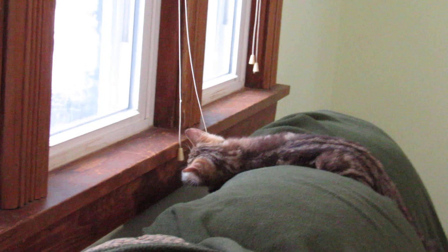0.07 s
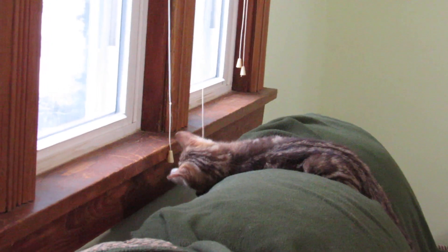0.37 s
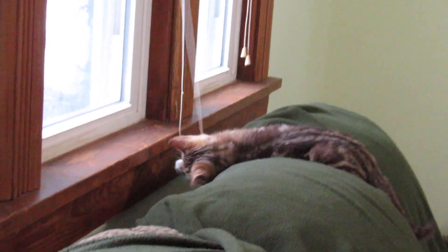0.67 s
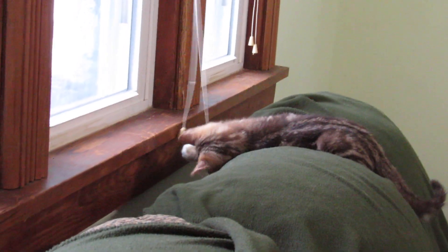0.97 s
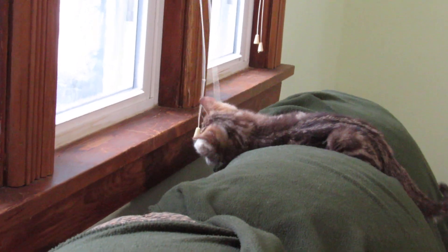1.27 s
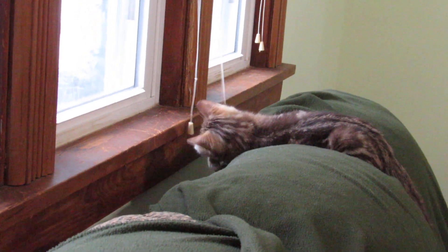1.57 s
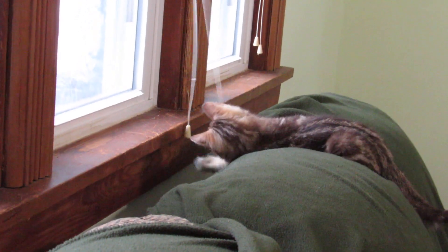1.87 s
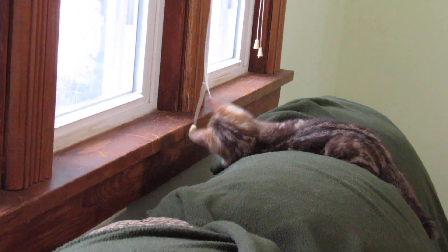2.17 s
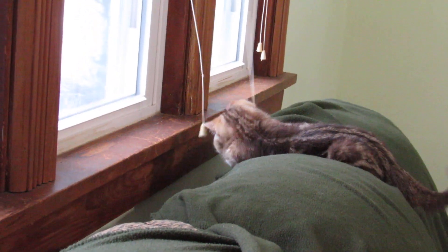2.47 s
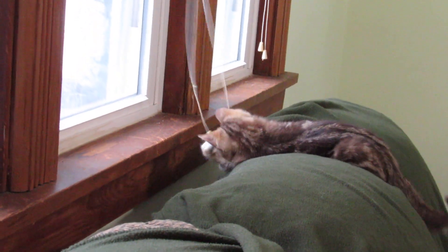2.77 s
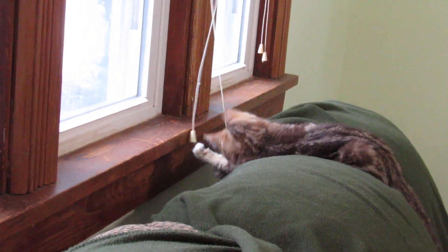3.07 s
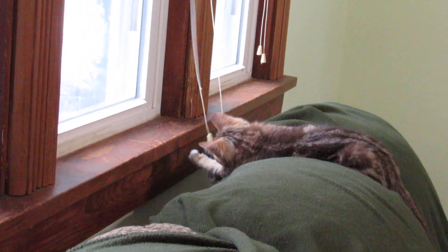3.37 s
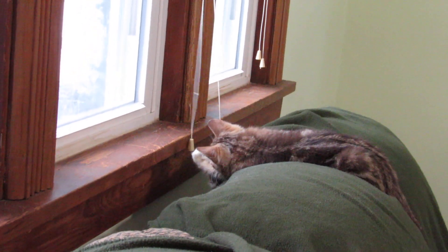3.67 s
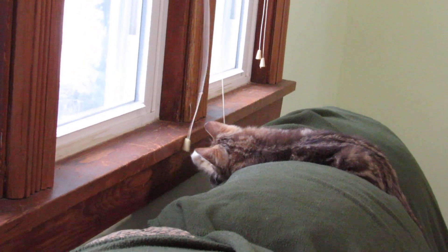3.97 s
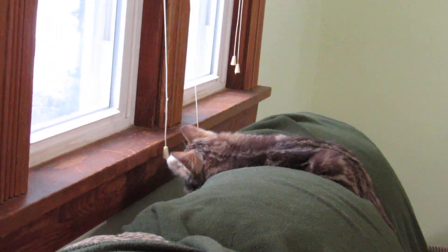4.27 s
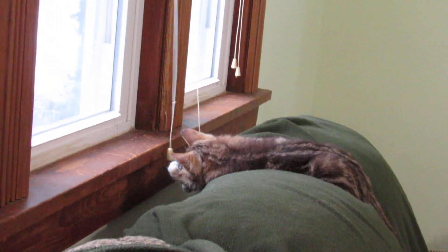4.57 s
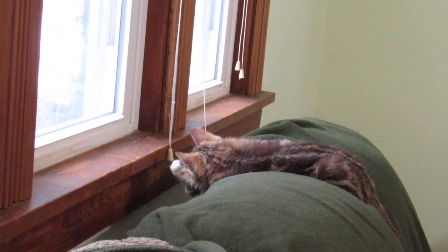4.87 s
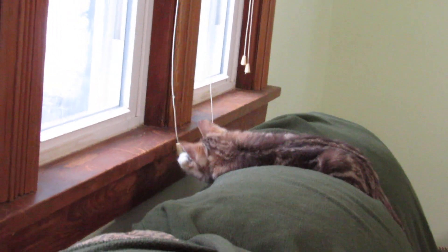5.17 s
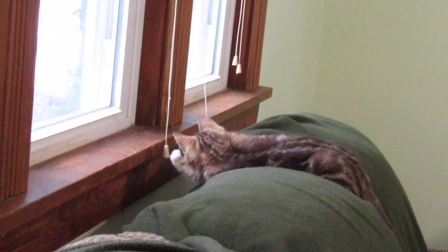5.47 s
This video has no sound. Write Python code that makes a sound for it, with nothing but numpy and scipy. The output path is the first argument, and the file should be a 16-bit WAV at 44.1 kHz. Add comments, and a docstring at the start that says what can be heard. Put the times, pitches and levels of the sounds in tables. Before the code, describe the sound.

Tiny, uneven ticks and brief scratchy rasps come from a kitten chewing and batting at blind cords, with a faint rustle of fur against a sofa. The light patter carries on the whole time, with the clearest click about halfway through. Everything is quiet, heard through a small microphone in a room with short reflections, over a steady low hum and soft airy noise.

```python
"""Mains hum and a soft rush of air fill a quiet room, picked up by a small camera's two microphone ports.
On a sofa by the window a kitten lies mouthing and pawing the blind cords. Its mouth and the cord make
tiny pitched clicks, part ring and part rub; fur, claws and cord scuff in short rasps, and its coat
rustles on the sofa cover. Window and wall return close echoes of the clicks and rasps."""
import sys
import numpy as np
from scipy import signal
from scipy.fft import rfft, irfft
from scipy.io import wavfile

SR = 44100
rng = np.random.default_rng(int(sys.argv[2]) if len(sys.argv) > 2 else 0)


def materialize(psi):
    """Save the field psi as 16-bit PCM at rate SR to the path in sys.argv[1].

    A 1-D psi becomes a single channel; in a 2-D psi each row is a channel.
    """
    bounded = np.clip(np.atleast_2d(psi).T, -1, 1)
    quanta = np.round(bounded * 32767).astype(np.int16)
    wavfile.write(sys.argv[1], SR, quanta)


N = 242991

# slow rise and fall of the treble, followed by fur, faint ticks and faint rasps: time_s, level_db
TREBLE_SWELL = [(0.27, -0.5), (0.35, -1.5), (0.79, -2.1), (0.99, 0), (1.35, -3.5), (1.71, 3), (1.79, 1),
                (2.09, 3), (2.57, -0.4), (2.77, -1), (2.91, 1.3), (3.77, 0.5), (4.01, 0.6), (4.09, -3),
                (4.23, 2), (4.73, -1.5), (4.97, 2.5), (5.49, 0.7)]


def amp(db):
    """Decibels to gain."""
    return 10 ** (np.asarray(db) / 20)


def unit(x):
    """Scales to rms 1."""
    return x / np.sqrt(np.mean(x ** 2) + 1e-20)


def read(points, hz):
    """Reads a table on a log-frequency axis."""
    f, value = np.transpose(points)
    return np.interp(np.log(hz + 1), np.log(f + 1), value)


def band(hz, centre_hz, spread):
    """A bell-shaped band; spread is in octaves."""
    return np.exp(-(np.log2((hz + 1) / centre_hz) / (2 * spread)) ** 2)


def add(mix, s, sound):
    """Adds a sound to the mix at time s."""
    part = mix[..., round(s * SR):][..., :sound.shape[-1]]
    part += sound[..., :part.shape[-1]]


def drift(rate_hz):
    """Slow random motion of rms 1."""
    hz = np.fft.rfftfreq(N, 1 / SR)
    return unit(irfft(rfft(rng.standard_normal(N)) * np.exp(-(hz / rate_hz) ** 2), N))


def treble_db(s):
    """The treble's rise or fall at time s."""
    return np.interp(s, *np.transpose(TREBLE_SWELL))


def ports(pair, colour):
    """Colours two unrelated signals and makes them as alike as the two microphone ports hear them."""
    # likeness of the two ports: frequency_hz, coherence (0-1)
    likeness = [(60, 0.36), (300, 0.37), (700, 0.75), (1400, 0.79), (3100, 0.96), (6800, 0.63), (11000, 0),
                (15000, 0)]
    size = pair.shape[1]
    hz = np.fft.rfftfreq(size, 1 / SR)
    mid, other = rfft(pair)
    coherence = np.clip(read(likeness, hz), 0, .98)
    side = other * np.sqrt((1 - coherence) / (1 + coherence))
    return irfft(np.array([mid + side, mid - side]) * colour(hz), size)


def air(notch_hz=680, notch_width_hz=520, low_cut_hz=41):
    """Steady room rush as the camera hears it, hollowed near 680 Hz by the camera's notch filter."""
    # underlying slope of the rush: frequency_hz, density_db
    slope = [(45, -63), (100, -68), (160, -72), (215, -78), (290, -69), (420, -71.5), (900, -75),
             (1600, -84), (2400, -92.5), (4500, -99.5), (9000, -101.5), (15000, -108)]
    # resonances that stand out of it: centre_hz, width_hz, height_db
    resonances = [(266, 11, 11), (493, 19, 12), (1105, 50, 6), (1620, 45, 3), (2930, 420, 5)]

    def colour(hz):
        peaks_db = sum(height / (1 + (2 * (hz - f) / width) ** 2) for f, width, height in resonances)
        off_notch = hz ** 2 - notch_hz ** 2
        notch = abs(off_notch) / np.hypot(off_notch, notch_width_hz * hz)
        low_cut = 1 / np.sqrt(1 + (low_cut_hz / (hz + 1)) ** 16)
        return amp(read(slope, hz) + peaks_db) * low_cut * notch

    return ports(rng.standard_normal((2, N)), colour) * np.sqrt(SR / 2)


def hum(waver=0.12):
    """Mains harmonics, each wavering a little in strength, slightly to the left."""
    # lines of the mains hum: pitch_hz, rms_db
    harmonics = [(60, -61), (120, -44.8), (180, -48.9), (240, -56), (300, -50.6), (360, -54.8), (600, -72),
                 (840, -73)]
    t = np.arange(N) / SR
    lines = np.zeros(N)
    for hz, db in harmonics:
        strength = amp(db) * (1 + waver * drift(1.5))
        lines += strength * np.sin(2 * np.pi * (hz * t + rng.random()))
    return np.sqrt(2) * lines * amp([[.25], [-.25]])


def grains(size, per_s, bed):
    """Two streams of tiny random slips over a bed of smooth friction noise."""
    slips = rng.standard_normal((2, size)) * (rng.random((2, size)) < per_s / SR)
    return unit(slips) + bed * rng.standard_normal((2, size))


def fur(level_db=-65, centre_hz=6000, spread_octaves=1.0, follow=3.2):
    """Fur shifts against the sofa cover in a faint, uneven rustle."""
    pressure = amp(8 * np.tanh(drift(rate_hz=28)))
    swell = amp(follow * treble_db(np.arange(N) / SR))
    slips = grains(N, per_s=900, bed=.9) * pressure * swell
    return amp(level_db) * unit(ports(slips, lambda hz: band(hz, centre_hz, spread_octaves)))


def click(hz, db, rough, lead_s=0.0039, rise_s=0.0024, decay_s=0.0076, bend=.07,
          rub_s=0.0063, rub_octaves=0.08, rub_db=-1, skirt=0.12):
    """One contact: a brief ring with sagging pitch and a narrow-band rub, peaking about 0.05 s in."""
    rough = np.clip(rough, 0, 1)
    t = np.arange(-SR // 20, SR // 20) / SR
    age = np.maximum(t + lead_s, 0)
    decay = np.exp(-age / decay_s)
    swell = (1 - np.exp(-(age / rise_s) ** 2)) * decay
    turns = np.cumsum(hz * (1 + bend * (decay - .5))) / SR
    ring = np.sqrt(2) * np.sin(2 * np.pi * turns) * swell / swell.max()
    # rough contacts linger; every contact builds faster than it fades
    width_s = rub_s * (.4 + .6 * rough) * np.where(t < 0, .7, 1.1)
    touch = np.exp(-(t / width_s) ** 2 / 2)
    colour = lambda f: band(f, hz, rub_octaves) + skirt * band(f, hz, 0.38)
    rub = touch * ports(rng.standard_normal((2, len(t))), colour)
    rub *= amp(rub_db) * np.linalg.norm(ring) / np.linalg.norm(rub.mean(0))
    blend = np.sqrt(1 - rough) * ring + np.sqrt(rough) * rub
    # the strength of the contact sets its energy, however ring and rub happen to line up
    return amp(db) * blend * np.linalg.norm(ring) / np.linalg.norm(blend.mean(0))


def patter(spread_db=3.0, scatter_octaves=.2, rough=0.82, follow=1.0, count=270):
    """Faint ticks, mostly rub, at random moments throughout."""
    # pitches around which the ticks gather: pitch_hz, typical_level_db
    pitches = [(2200, -53), (3080, -55), (4050, -56), (5200, -59.5), (6800, -62.5), (8500, -57.5)]
    out = np.zeros((2, N))
    for k, (when, which, detune, size) in enumerate(rng.random((count, 4))):
        s = (k + 2 * when) / count * N / SR
        hz, db = pitches[int(which * len(pitches))]
        hz = hz * 2 ** (scatter_octaves * (2 * detune - 1))
        db = db + spread_db * (2 * size - 1) + follow * treble_db(s + 1 / 20)
        add(out, s, click(hz, db, rough))
    return out


def rasp(length_s, db, centre_hz, rise_s=0.0013, rise_per_octave_s=0.00068, fall_s=0.0055,
         skirt=.06, skirt_hz=6000, skirt_octaves=1.6, low_cut_hz=1300):
    """A quick run of slips in one band over a weak broad skirt; high rasps build more slowly."""
    t = np.arange(SR // 10) / SR
    build_s = rise_s + rise_per_octave_s * max(np.log2(centre_hz / 2000), 0)
    stroke = (1 - np.exp(-t / build_s)) * np.exp(-np.maximum(t - length_s, 0) / fall_s)
    octaves = 1.06 * (2000 / centre_hz) ** .85  # low rasps are broad, high ones narrow

    def colour(hz):
        low_cut = 1 / np.sqrt(1 + (low_cut_hz / (hz + 1)) ** 8)
        return (band(hz, centre_hz, octaves) + skirt * band(hz, skirt_hz, skirt_octaves)) * low_cut

    slips = stroke * ports(grains(len(t), per_s=1000, bed=1), colour)
    return amp(db) * slips * np.linalg.norm(stroke) / np.linalg.norm(slips.mean(0))


def scuffs(trim_db=-3, faint_db=-55, faint_s=0.0092, fall_per_octave_db=5.0, follow=1.1, count=40):
    """Fur, claws and cord scuff: clear rasps, and faint random ones that weaken the higher they lie."""
    # the clear rasps: start_s, length_s, level_db (before trim), centre_hz
    strokes = [(0.325, 0.024, -49, 2600), (0.382, 0.009, -51, 3200), (0.533, 0.0097, -50, 6800),
               (0.561, 0.031, -50, 2000), (0.688, 0.0086, -47, 3600), (0.866, 0.014, -52.5, 5300),
               (0.966, 0.056, -54, 1900), (1.17, 0.016, -52.5, 3100), (1.417, 0.014, -50, 2200),
               (1.676, 0.021, -44.5, 2400), (2.031, 0.025, -52, 8300), (2.149, 0.016, -52, 6500),
               (2.27, 0.042, -55.5, 8200), (2.551, 0.017, -49.5, 6950), (2.601, 0.011, -49.5, 6760),
               (2.888, 0.015, -45, 8300), (2.928, 0.022, -47.5, 1900), (3.096, 0.016, -42.5, 2400),
               (3.246, 0.0089, -54, 3300), (3.342, 0.015, -47.5, 7360), (3.385, 0.019, -50, 7200),
               (3.639, 0.013, -47.5, 1800), (4.006, 0.01, -46, 7850), (4.168, 0.052, -54.5, 6300),
               (4.274, 0.011, -47, 1800), (4.341, 0.035, -51, 7000), (4.624, 0.03, -50, 2200),
               (4.897, 0.011, -47, 1800), (4.93, 0.0099, -49.5, 8700), (4.947, 0.03, -55, 1800),
               (5.271, 0.015, -44, 6600), (5.419, 0.014, -46.5, 1800)]
    out = np.zeros((2, N))
    for s, length_s, db, centre_hz in strokes:
        add(out, s, rasp(length_s, db + trim_db, centre_hz))
    for k, (when, which) in enumerate(rng.random((count, 2))):
        s = (k + when) / count * N / SR
        octaves = 2.3 * which
        db = faint_db - fall_per_octave_db * octaves + follow * treble_db(s)
        add(out, s, rasp(faint_s, db, 2000 * 2 ** octaves))
    return out


def clicks(trim_db=1, rough_at_1_khz=0.13, rough_per_octave=0.17):
    """Mouth and cord click clearly; the higher the pitch, the more rub and the less ring."""
    # the clear clicks: peak_s, pitch_hz, level_db (before trim)
    contacts = [(0.345, 4070, -49.5), (0.388, 3020, -46.5), (0.582, 2200, -46), (0.596, 2610, -43),
                (0.97, 2100, -48), (1.016, 3060, -46), (1.116, 4060, -50.5), (1.285, 8700, -50.5),
                (1.427, 3006, -46), (1.429, 1626, -38), (1.505, 3130, -50), (1.573, 2050, -50.5),
                (1.614, 9840, -51.5), (1.69, 3100, -42), (1.698, 2300, -49), (1.753, 1605, -44.5),
                (2.042, 2410, -50.5), (2.193, 1640, -43), (2.242, 1378, -42.5), (2.257, 1132, -36),
                (2.398, 4640, -52.5), (2.624, 1460, -41.5), (2.661, 1135, -43.5), (2.669, 7690, -44),
                (2.77, 1225, -46), (2.922, 1408, -41.5), (2.936, 1144, -31.5), (2.967, 1700, -45.5),
                (3.007, 3070, -48), (3.037, 1210, -46.5), (3.873, 4000, -52), (3.932, 1500, -45.5),
                (3.975, 5400, -53), (4.634, 1641, -37.5), (4.903, 1460, -36.5), (4.987, 2330, -47),
                (5.184, 1637, -43.5), (5.275, 4000, -53), (5.339, 4120, -48), (5.418, 3050, -47),
                (5.469, 5250, -51)]
    out = np.zeros((2, N))
    for peak_s, hz, db in contacts:
        rough = rough_at_1_khz + rough_per_octave * np.log2(hz / 1000)
        add(out, peak_s - 1 / 20, click(hz, db + trim_db, rough))
    return out


def room(x, gap_s=0.0037, near_db=5, near_s=0.0078, echoes_per_s=3000):
    """Close echoes from window and wall, then a short tail that dies sooner in the treble."""
    # ring of the room: frequency_hz, t60_s
    ring_times = [(500, 0.36), (3000, 0.16), (12000, 0.14)]
    size = SR // 2
    taps = rng.choice([-1., 1.], (2, size)) * (rng.random((2, size)) < echoes_per_s / SR)
    hz, t, spectra = signal.stft(taps, SR, nperseg=256)
    decay_db = -60 * t / read(ring_times, hz)[:, None] + near_db * np.exp(-t / near_s)
    echoes = signal.istft(spectra * amp(decay_db), SR, nperseg=256)[1][:, :size]
    tail = ports(echoes, np.ones_like) * (np.arange(size) > gap_s * SR)
    return signal.fftconvolve(x, tail / np.linalg.norm(tail.mean(0)), axes=1)[:, :N]


def scene(echo_db=-6):
    """The kitten's small sounds and their echoes over the room's hum and air."""
    room_tone = air() + hum()
    kitten = clicks() + patter() + scuffs()
    echoes = room(amp(echo_db) * kitten)
    return room_tone + kitten + echoes + fur()


def record(dry, opens_s=.248, fade_s=.005, edge_hz=15150):
    """The camera's microphone: a little louder on the left, silent at first, with the top treble cut."""
    # left port minus right port: frequency_hz, balance_db
    balance = [(60, 1.0), (700, 1.1), (1150, 3.2), (2400, 1.8), (4400, 1.0), (15000, 1.1)]
    tilt_db = read(balance, np.fft.rfftfreq(N, 1 / SR)) / 2
    heard = irfft(rfft(dry) * amp([tilt_db, -tilt_db]), N)
    fade_in = np.clip((np.arange(N) / SR - opens_s) / fade_s, 0, 1) ** 2
    low_pass = signal.firwin(511, edge_hz, window=("kaiser", 9), fs=SR)
    return signal.oaconvolve(heard * fade_in, low_pass[None], "same")


dry = scene()
out = record(dry)
materialize(out)
```